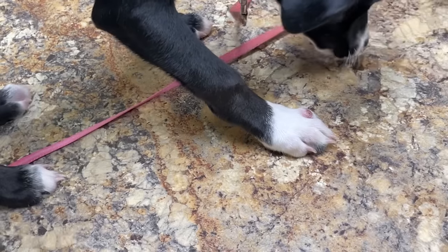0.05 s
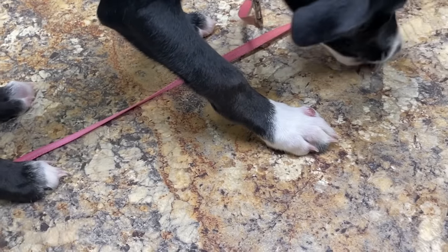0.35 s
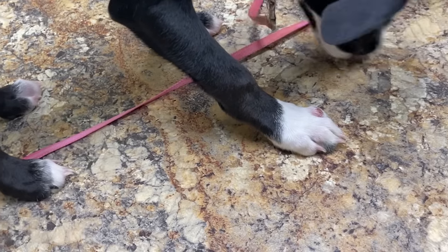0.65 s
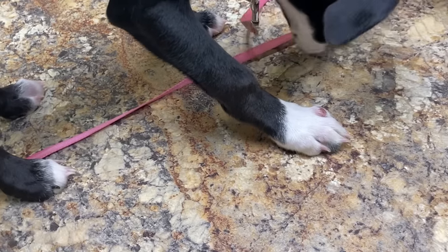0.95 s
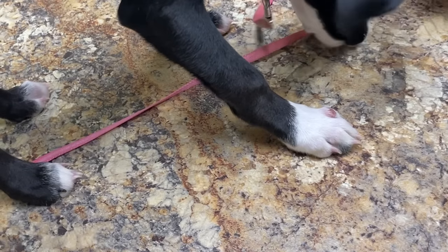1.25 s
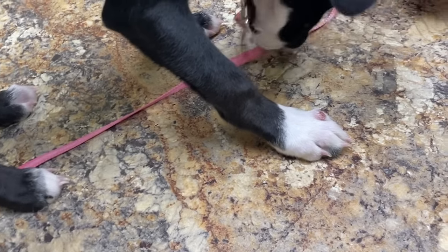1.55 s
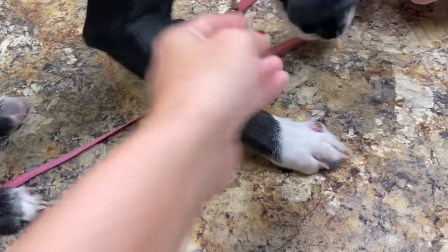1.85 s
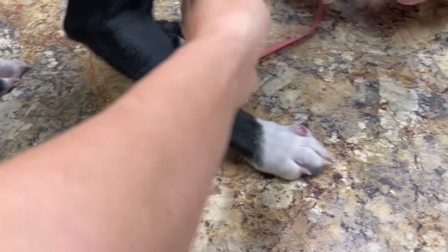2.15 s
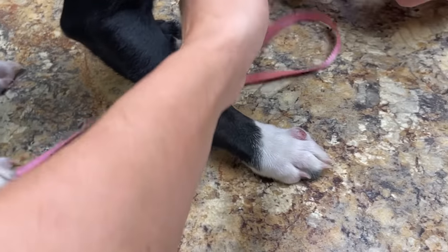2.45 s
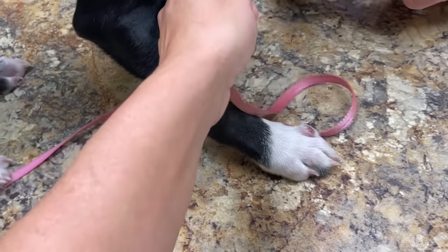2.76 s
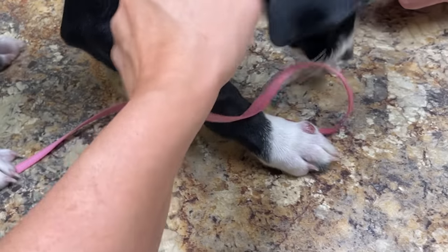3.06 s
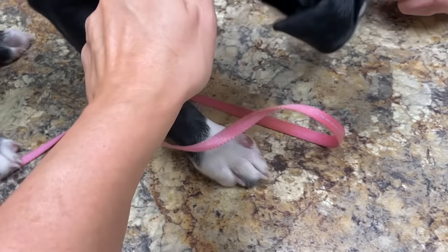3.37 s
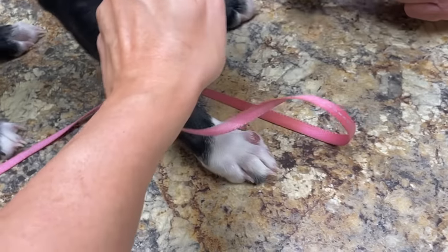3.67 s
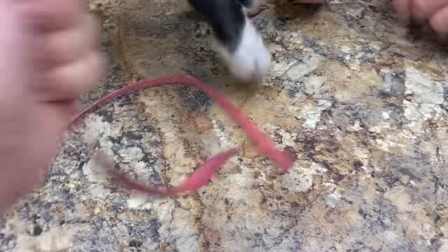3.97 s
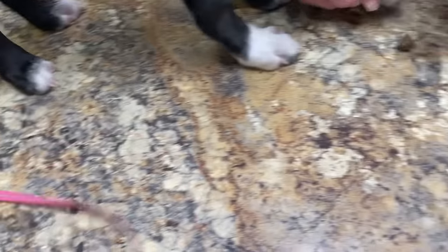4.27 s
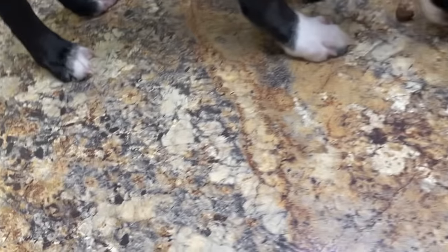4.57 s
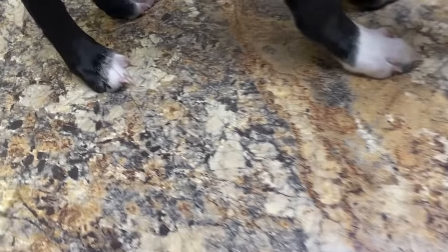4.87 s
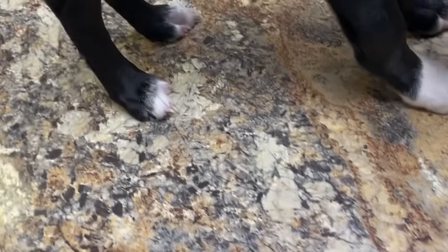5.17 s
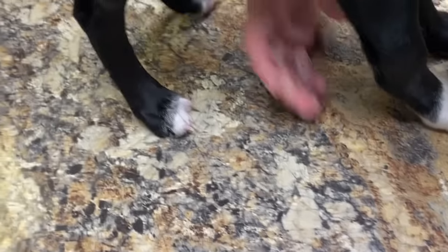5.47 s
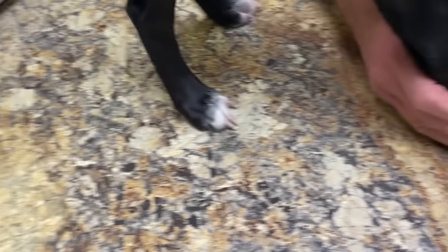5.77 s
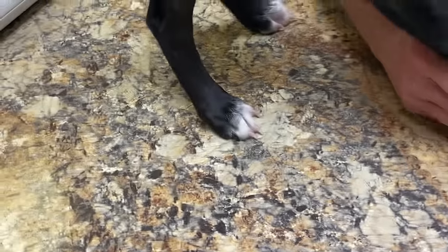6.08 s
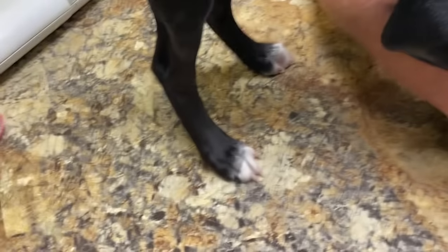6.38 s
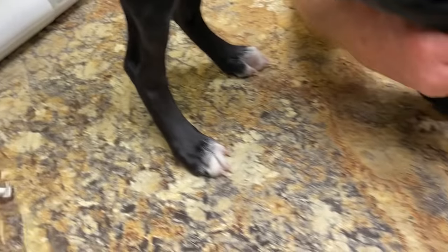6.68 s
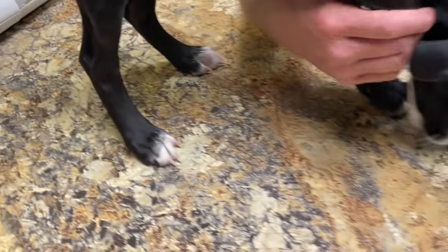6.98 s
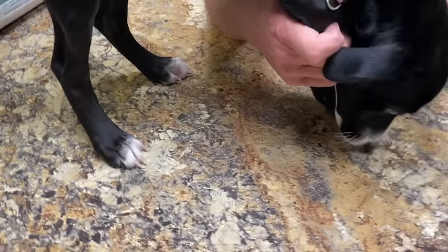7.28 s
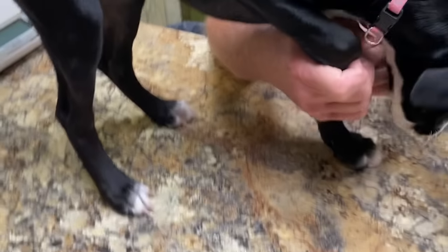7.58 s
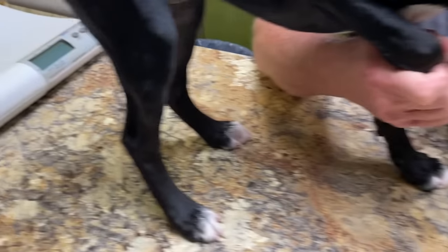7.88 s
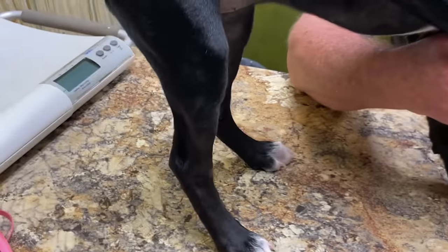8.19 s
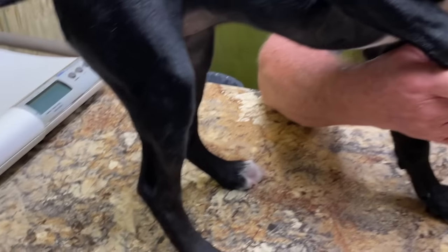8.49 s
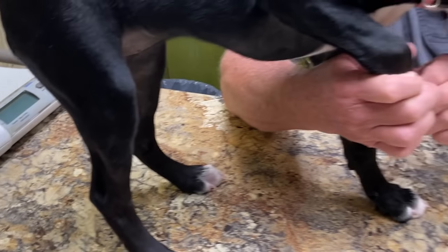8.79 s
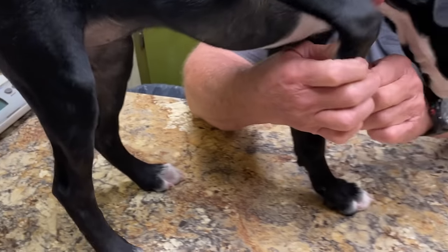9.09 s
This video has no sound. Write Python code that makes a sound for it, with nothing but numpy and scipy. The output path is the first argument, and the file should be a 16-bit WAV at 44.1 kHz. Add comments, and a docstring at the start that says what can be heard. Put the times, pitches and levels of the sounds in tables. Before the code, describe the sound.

A puppy's claws tick and paws shuffle on stone amid faint fur and leash rubbing, a ringing clack and steady ventilation hum.

```python
"""A puppy is held and shifted about on a stone table: fur and leash rub in fine grains, pads drag.
Claws tick, paws pat and firmer contacts knock on the slab. A hard piece, such as the leash clasp,
clacks down and rings; one thin squeak slides down in pitch. Ventilation hums in the small room.
The stereo image is widened, with the channels near antiphase at 10 kHz."""
import sys
import numpy as np
from scipy import signal
from scipy.fft import rfft, irfft, next_fast_len
from scipy.io import wavfile
from scipy.ndimage import uniform_filter1d, map_coordinates

SR = 44100
rng = np.random.default_rng(int(sys.argv[2]) if len(sys.argv) > 2 else 0)


def wav_record(signal):
    """Record a signal, one row per channel, as 16-bit PCM in the file named by sys.argv[1]."""
    frames = np.transpose(np.atleast_2d(signal))
    bounded = np.clip(frames, -1, 1)
    # unit amplitude maps onto the largest positive 16-bit level
    quanta = np.round(bounded * 32767).astype(np.int16)
    wavfile.write(sys.argv[1], SR, quanta)


N = 407484

# Hands over the coat. Each row: start and length in seconds, rub and fur hiss levels in dB.
STROKES = [(0.39, 0.92, -65.5, -87), (1.6, 0.54, -62, -68), (3.38, 0.47, -62, -70), (4.063, 0.66, -62, -69),
           (4.87, 0.44, -63.5, -68.5), (5.4, 0.67, -74, -69.5), (6.137, 0.57, -59, -72.5),
           (7.22, 0.35, -60.5, -73), (8.324, 0.069, -67.5, -75), (8.701, 0.65, -68, -88)]
# The holding hand, never quite still. Each row: time in seconds, fur hiss level in dB.
HOLD_HISS = [(0, -74), (2.8, -74), (6.0, -75), (7.6, -73.5), (8.0, -95.5), (8.6, -81.5), (9.2, -82)]
# Noise colours of rubbing, fur and pads. Each row: frequency in Hz, level in dB.
RUB_SPECTRUM = [(400, -21.5), (900, 5), (1500, -2), (2000, -6.5), (2750, -2.5), (3800, -7), (6000, -5),
                (12000, -47.5)]
FUR_SPECTRUM = [(1500, -26), (3500, -7.5), (5500, -7.5), (8500, 1), (12000, -0.5), (15500, -4.5)]
PAD_SPECTRUM = [(120, -24), (240, 2), (400, 2), (700, -2), (1200, -9), (2500, -38)]
# Pitches of the crinkles within the rubbing.
CRINKLE_HZ = [1500, 2300, 3400, 4800, 6500]
# Brisk strokes. Each row: peak time in seconds, level in dB, rise and fall in seconds,
# centre in Hz, bandwidth over centre.
SWISHES = [(1.44, -50, 0.038, 0.017, 2520, 2.2), (3.299, -51, 0.054, 0.042, 2340, 3.2),
           (4.745, -54.5, 0.022, 0.035, 1390, 3.3), (4.955, -49, 0.033, 0.015, 2280, 2.6),
           (5.463, -43.5, 0.0089, 0.0042, 2750, 0.81), (5.901, -57, 0.054, 0.049, 9000, 3.1),
           (7.543, -58.5, 0.029, 0.037, 5950, 2.3), (8.445, -57, 0.1, 0.038, 1860, 1.33),
           (9.1, -58, 0.039, 0.07, 7930, 2.9)]
# Webbing drawn along; paws sliding. Each row: start and length in seconds, level in dB.
LEASH_PULLS = [(0.394, 1.07, -66.5), (1.695, 0.65, -69), (3.358, 0.35, -58.5), (4.15, 0.37, -64),
               (7.23, 0.26, -67)]
SHUFFLES = [(3.234, 0.35, -53), (4.15, 0.72, -53), (4.907, 0.29, -51), (5.35, 0.83, -57.5),
            (6.17, 0.44, -53)]
# Skin or paw juddering on stone. Each row: start and length in seconds, pitch in Hz, level in dB.
GROANS = [(6.421, 0.019, 447, -33), (8.55, 0.01, 146, -28.5), (8.599, 0.018, 150.8, -31)]
# Claws and collar parts. Each row: start in seconds, level in dB, centre in Hz,
# bandwidth over centre, relative snap level in dB.
TICKS = [(0.1513, -43, 1750, 0.43, -14), (0.172, -44, 1780, 0.74, 0), (0.176, -54, 14800, .3, -12),
         (0.2818, -45, 12900, 0.34, 2), (0.343, -51, 13000, 0.44, 6), (0.3585, -48, 5950, .3, -2),
         (0.4205, -55, 15000, .15, -21), (0.4368, -39.5, 3400, 0.59, -17), (0.505, -49, 15000, .25, -15),
         (0.508, -46, 3980, .6, -9), (0.7217, -41.5, 2820, 0.15, -3), (0.771, -49.5, 4600, .6, -12),
         (0.9447, -38.5, 3070, 0.84, -6), (1.037, -42, 3400, 0.41, -15), (1.207, -46, 7860, 0.17, -15),
         (1.34, -48, 3000, 0.9, -13), (1.4356, -38.5, 3240, .8, -16), (1.6453, -40, 2910, 0.62, -14),
         (1.657, -43, 3580, .9, -10), (1.651, -47, 14000, .4, -8), (1.9627, -38.5, 3000, 0.89, 2),
         (2.045, -46, 4330, .4, -12), (2.271, -48.5, 5590, 0.46, 12.5), (2.283, -48, 6500, .6, 3),
         (2.3252, -28, 4220, 0.91, -12), (2.443, -55, 6000, 0.87, 7), (2.657, -51.5, 2100, 0.42, -8),
         (2.7077, -48, 2300, 0.39, -2), (2.717, -53, 2200, .3, -15), (2.754, -52, 2500, .4, -15),
         (2.785, -46, 7540, .5, -6), (2.7905, -48, 14500, .2, -6), (2.7938, -46, 2800, 1.2, -2),
         (2.814, -51, 5000, .6, -12), (2.879, -41.5, 4800, 0.77, -10), (3.293, -47, 7000, .8, 9),
         (3.465, -51, 2700, .7, 18), (3.551, -44, 6500, .7, 10), (3.562, -37, 5570, .35, 2),
         (3.7693, -39, 3700, 0.18, 12), (3.8095, -34.5, 6000, 1.6, -2), (4.084, -52, 2900, 0.54, 7),
         (4.0975, -36, 1390, 0.67, -5), (4.311, -52.5, 2610, 0.76, 19.5), (4.381, -41.5, 7000, 0.67, -1),
         (4.5005, -44, 5070, 0.55, 8), (4.737, -41, 1500, 0.41, -8), (4.905, -39.5, 5170, 0.34, 2),
         (5.011, -35.5, 2300, 0.85, -6), (5.016, -37, 2000, 1.4, -12), (5.024, -41, 2400, 0.93, -8),
         (5.089, -43, 4500, .7, -6), (5.107, -47, 14000, .4, -10), (5.1423, -39, 1670, 0.58, -7),
         (5.2435, -42.5, 1970, 0.79, -17), (5.268, -46, 3500, 1, -10), (5.4035, -36, 6450, 0.72, -10),
         (6.0962, -27.5, 7700, 0.7, 7.5), (6.1837, -40.5, 3380, 0.71, 3), (6.288, -47, 12900, .5, -2),
         (6.343, -36.5, 4000, 1.2, -20), (6.405, -39, 2620, .6, -6), (6.4135, -32, 4560, 0.53, -13),
         (6.487, -41, 2800, 0.22, -8), (6.585, -43, 2050, 1.2, -6), (6.6835, -23, 4830, 0.12, -9),
         (6.829, -35, 1900, 1.3, -22), (6.8648, -39, 1940, 0.91, -19), (7.101, -42.5, 1990, 0.6, -15),
         (7.1195, -38.5, 2110, 1.1, -5), (7.389, -51, 13800, .3, -12), (7.786, -49.5, 2200, 0.54, 3.5),
         (7.8774, -42, 1790, 0.46, -20.5), (9.0365, -46, 4630, 0.17, -21.5)]
# Paws, arms and leash landing. Each row: start in seconds, level in dB, pitch in Hz,
# scuff T60 in seconds, relative slap level in dB.
PATS = [(0.357, -44, 550, 0.03, -10), (2.325, -38, 730, 0.035, -4), (3.616, -40, 240, 0.15, -30),
        (4.043, -35.5, 285, 0.025, -12), (4.252, -38.5, 444, 0.045, -19), (5.01, -43.5, 510, 0.14, -23),
        (5.035, -41, 590, 0.046, -14), (5.529, -32, 96, 0.11, -36), (6.343, -39.5, 976, 0.022, -3.5),
        (6.585, -40, 606, .03, -12.5), (8.701, -36.5, 83.6, 0.12, -39), (8.746, -40, 166, 0.03, -32),
        (8.872, -33, 124.8, 0.037, -30)]
# Firm contacts. Each row: start in seconds, level in dB, body pitch in Hz, its T60 in seconds,
# upper pitch in Hz, its T60 in seconds, its relative level in dB.
KNOCKS = [(0.945, -35.5, 750, 0.021, 993, 0.063, -9.5), (1.963, -32, 810, 0.03, 1870, 0.04, -2.5),
          (1.9892, -36.5, 1040, 0.021, 1950, 0.015, -2), (4.0969, -24, 422, 0.022, 778, 0.019, -1),
          (4.1097, -33, 515, 0.025, 1500, 0.024, -11), (4.6488, -35, 360, 0.04, 720, 0.034, -5),
          (5.0878, -35.5, 623, 0.035, 1160, 0.033, -5), (5.532, -30, 327, 0.014, 740, 0.026, -9),
          (6.4878, -28, 660, 0.018, 1240, 0.056, -25)]
# The clasp's landing and bounce. Each row: start in seconds, level in dB.
CLACKS = [(6.6914, -2), (6.7144, -20.5)]
# Modes of clasp and table. Each row: frequency in Hz, relative level in dB, T60 in seconds.
CLASP_MODES = [(271, -3.5, 0.43), (329, 0, 0.2), (365, 1.5, 0.14), (396, 2.5, 0.19), (496, 0, 0.23),
               (571, 0, 0.28), (1050, -0.5, 0.15), (1307, 0, 0.19), (1413, -0.5, 0.2), (1590, 5, 0.12),
               (2014, 3.5, 0.19), (2490, 8, 0.087), (2664, 3, 0.15), (2720, -1, .13), (3000, 1, .15),
               (3000, 4.5, 0.15), (3580, 7.5, 0.11), (4250, 7, .11), (4802, 4.5, .13), (5470, 2, 0.12),
               (7250, -0.5, 0.073)]
# Colours of the clasp's blow and the squeak's echo. Each row: frequency in Hz, level in dB.
CLASP_SPECTRUM = [(200, -39), (290, -5), (400, -2.5), (600, -1.5), (1000, 0), (1250, -6.5), (1550, -1.5),
                  (2000, -4), (2900, 2.5), (3800, -3.5), (5500, 1.5), (7500, -4), (9000, -5), (11000, -15),
                  (15000, -21)]
SQUEAK_ECHO_SPECTRUM = [(4000, -5.5), (4450, -6), (4950, -7.5), (5550, 7), (6200, 1), (12000, -1)]
# A faint higher branch, then the main squeak. Each row: peak time in seconds, pitch in Hz, level in dB, pitch
# swing as a fraction.
SQUEAKS = [(9.07, 7100, -58.5, 0.039), (9.087, 5180, -31, 0.19)]
# Air in the ducts. Each row: frequency in Hz, level in dB.
DUCT_SPECTRUM = [(22, -31), (35, -9), (52, -3.5), (80, -7), (140, -1), (220, -12), (310, -16), (430, -12.5),
                 (570, -16.5), (650, -20), (970, -21.5), (1130, -30.5), (1400, -31), (1650, -36),
                 (3000, -39), (6000, -52.5), (15000, -53)]
# Low room resonances. Each row: frequency in Hz, nominal width in Hz, level in dB.
HUM_MODES = [(60.8, 4.9, -53), (95.1, 17, -52.5), (135, 9.9, -48), (149.16, 2.9, -56), (171.3, 30, -63),
             (194.3, 18.3, -59), (391.5, 4.8, -71), (573, 34, -72.5), (955, 45, -75)]
# Room decay. Each row: frequency in Hz, T60 in seconds.
ROOM_T60 = [(150, 0.06), (500, 0.41), (2500, 0.21), (6000, 0.18), (15000, 0.14)]
# Stereo widening, near antiphase at 10 kHz. Each row: frequency in Hz, left-right correlation.
CORRELATION = [(120, 1), (300, 0.94), (500, 0.19), (800, -0.46), (1200, -0.021), (1900, 0.67),
               (3300, -0.069), (4200, 0.32), (4850, -0.41), (6000, 0.45), (7600, 0.024), (9200, -1),
               (11000, -1), (14500, 0.9)]
# Channel balance. Each row: frequency in Hz, left minus right in dB.
BALANCE = [(150, 0), (350, 3), (600, .3), (1100, -3), (2500, -.8), (5000, -.8), (8000, .8)]

EVENT_TIME_S = np.arange(SR // 2) / SR
CENTRED_TIME_S = np.arange(-(SR // 4), SR // 4) / SR


def handling(hold_rub_db=-73.5, crinkle_db=-6):
    """Hairs catch and slip under the hands: grainy rubbing and fur hiss."""
    hiss_db = np.interp(np.arange(N) / SR, *np.transpose(HOLD_HISS))
    rub_power, fur_power = amp(hold_rub_db) ** 2, amp(hiss_db) ** 2
    for start_s, length_s, rub_db, fur_db in STROKES:
        speed = gesture(start_s, length_s, attack_s=0.046, release_s=0.2)
        rub_power += (amp(rub_db) * speed) ** 2
        fur_power += (amp(fur_db) * speed) ** 2
    rub_gain = np.sqrt(rub_power) * amp(-1.5 + 1.7 * wobble(35))
    rub = 0.95 * rush(RUB_SPECTRUM, amp(1.4 * wobble(700))) + amp(crinkle_db) * crinkles()
    fur_grains = amp(1.9 * wobble(1200) + 1.5 * wobble(150))
    fur = 1.03 * rush(FUR_SPECTRUM, fur_grains) + 0.39 * crackle()
    fur_gain = np.sqrt(fur_power) * amp(1 + 1.1 * wobble(30))
    return patchy(rub_gain * rub + fur_gain * fur, depth_db=2.5)


def crinkles(per_band_per_s=6.2):
    """Webbing and coat give way in irregular, loosely pitched steps."""
    shape = (len(CRINKLE_HZ), N)
    steps = (rng.random(shape) < per_band_per_s / SR) * amp(2 * rng.standard_normal(shape))
    slips = signal.fftconvolve(steps, fade(0.017)[None], axes=1)[:, :N] * rng.standard_normal(shape)
    bands = [bandpass(slip, hz, 0.4 * hz) / np.sqrt(hz) for slip, hz in zip(slips, CRINKLE_HZ)]
    return unit(in_room(sum(bands), wet_db=-5))


def crackle(catches_per_s=45):
    """Hairs catch crisply, each scraping for a few ms."""
    catches = (rng.random(N) < catches_per_s / SR) * amp(3.6 * rng.standard_normal(N))
    scrapes = signal.fftconvolve(catches, fade(0.007))[:N] * rng.standard_normal(N)
    return unit(in_room(bandpass(scrapes, 7600, 8000, stages=1), wet_db=-2.5))


def swishes():
    """Brisk strokes over the coat: grainy noise bands swell and stop."""
    out, t = np.zeros((2, N)), CENTRED_TIME_S
    for peak_s, db, rise_s, fall_s, hz, breadth in SWISHES:
        grains = rng.standard_normal(len(t)) * amp(2.7 * wobble(500)[:len(t)])
        band = unit(bandpass(grains, hz, breadth * hz))
        add(out, peak_s + t[0], in_room(amp(db) * swell(rise_s, fall_s) * band, wet_db=-5))
    return out


def leash():
    """Webbing ribs pass an edge at a near-steady rate: a faint, narrow zip."""
    pull = sum(amp(db) * gesture(start_s, length_s, attack_s=0.058, release_s=0.09)
               for start_s, length_s, db in LEASH_PULLS)
    flutter = amp(-4 + 3.1 * wobble(30))
    ribs = lambda f: resonance(f, 2720, 450) ** 2 + 0.5 * resonance(f, 3300, 400) ** 2
    return pull * flutter * unit(filtered(rng.standard_normal((2, N)), ribs))


def shuffling():
    """Soft pads drag over the stone."""
    drag = sum(amp(db) * gesture(start_s, length_s, attack_s=0.034, release_s=0.1)
               for start_s, length_s, db in SHUFFLES)
    return drag * amp(-1.5 + 2.6 * wobble(22)) * rush(PAD_SPECTRUM)


def groans(ramp_cycles=2):
    """Skin or a paw sticks and slips on polished stone at a near-steady rate."""
    out = np.zeros(N)
    for start_s, length_s, hz, db in GROANS:
        phase = 2 * np.pi * np.cumsum(hz * (1 + 0.08 * wobble(200))) / SR
        envelope = gesture(start_s, length_s, ramp_cycles / hz, ramp_cycles / hz)
        out += amp(db) * envelope * np.sin(phase + 0.24 * wobble(400))
    return in_room(out, wet_db=-8)


def ticks(rattle_t60_s=0.016, snap_t60_s=0.0083):
    """Claws and collar parts strike: a short rattle and a bright, drier snap."""
    out, impulse = np.zeros((2, N)), EVENT_TIME_S == 0
    for start_s, db, hz, breadth, snap_db in list(TICKS) + fidgets():
        rattle = peaked(bandpass(contact(rattle_t60_s), hz, breadth * hz))
        strike = 0.5 * impulse + 0.7 * contact(snap_t60_s)
        snap = peaked(bandpass(strike, 10000, 13000, stages=1))
        near = in_room(amp(snap_db + 0.5) * snap, wet_db=-7)
        add(out, start_s, amp(db - 1.5) * (in_room(rattle, wet_db=-4) + near))
    return out


def fidgets(end_s=6, per_s=4, breadth=0.27, snap_db=-8.5):
    """The puppy fidgets: faint ticks at loose intervals, as rows like TICKS."""
    draws = rng.standard_normal((int(end_s * per_s), 3))
    return [(abs(k + 0.5 + 0.5 * late) / per_s, -60.5 + 3 * loud, 3160 * 2 ** (0.56 * high),
             breadth, snap_db) for k, (late, loud, high) in enumerate(draws)]


def pats(slap_ratio=1.9, slap_t60_s=0.027):
    """Soft blows slap the slab and push it for a few cycles; it hardly rings."""
    out, t = np.zeros((2, N)), EVENT_TIME_S
    for start_s, db, hz, t60_s, slap_db in PATS:
        scuff = peaked(bandpass(contact(t60_s), hz, 0.72 * hz))
        push = np.sin(2 * np.pi * hz * t) * fade(1.2 * t60_s)
        onset = 1 - np.exp(-(t * hz) ** 2)  # flesh yields for about one cycle
        thud = peaked(onset * (scuff + 0.8 * push))
        slap_hz = slap_ratio * hz
        slap = peaked(bandpass(contact(slap_t60_s), slap_hz, 1.7 * slap_hz, stages=3))
        add(out, start_s, in_room(amp(db + 1) * (thud + amp(slap_db) * slap), wet_db=-3.5))
    return out


def knocks(force_rise_s=0.00041, crunch_db=-10.5, crunch_t60_s=0.034):
    """Firm contacts crunch briefly and ring two short notes of the table."""
    out, t = np.zeros((2, N)), EVENT_TIME_S
    for start_s, db, body_hz, body_t60_s, upper_hz, upper_t60_s, upper_db in KNOCKS:
        body = np.sin(2 * np.pi * body_hz * t) * fade(body_t60_s)
        upper = amp(upper_db) * np.sin(2 * np.pi * upper_hz * t) * fade(upper_t60_s)
        notes = peaked((1 - np.exp(-t / force_rise_s)) * (body + upper))
        crunch = peaked(bandpass(contact(crunch_t60_s), upper_hz, 1.1 * upper_hz))
        add(out, start_s, in_room(amp(db) * (notes + amp(crunch_db) * crunch), wet_db=-7))
    return out


def clasp():
    """A hard piece hits stone: crack, brief chatter, hollow ring."""
    out, t = np.zeros((2, N)), EVENT_TIME_S
    blow = peaked(minimum_phase(CLASP_SPECTRUM))
    crack = np.pad(blow, (0, len(t) - len(blow)))
    for start_s, db in CLACKS:
        chatter = signal.fftconvolve(0.18 * contact(0.023), blow)[:len(t)]
        ring = np.zeros(len(t))
        for hz, mode_db, t60_s in CLASP_MODES:
            gain = amp(mode_db + rng.normal(0, 1))
            ring += gain * np.sin(2 * np.pi * (hz * t + rng.random())) * fade(t60_s)
        clack = in_room(crack, wet_db=0.5) + chatter + in_room(amp(-33) * ring, wet_db=-16.5)
        add(out, start_s, amp(db) * clack)
    return out


def squeak(glide_s=0.014):
    """A thin tone with two weak overtones slides down; its upper part lingers in the room."""
    out, t = np.zeros((2, N)), CENTRED_TIME_S
    for peak_s, pitch_hz, db, swing in SQUEAKS:
        hz = pitch_hz * (1 - swing * np.tanh(t / glide_s))
        phase = 2 * np.pi * np.cumsum(hz * (1 + 0.013 * wobble(900)[:len(t)])) / SR
        tone = np.sin(phase) + amp(-15) * np.sin(2 * phase) + amp(-22) * np.sin(3 * phase)
        grip = amp(2.5 * wobble(450)[:len(t)])
        direct = amp(db) * tone * grip * swell(rise_s=0.006, fall_s=0.0094)
        tail = in_room(direct, wet_db=2, stretch=1.1) - direct
        echo = filtered(tail, lambda f: amp(along(SQUEAK_ECHO_SPECTRUM, f)))
        add(out, peak_s + t[0], direct + echo)
    return out


def ventilation(duct_db=-46.5):
    """Air rushes in the ducts and keeps low room resonances humming."""
    def modes(f):
        return np.sqrt(sum(amp(db) ** 2 / width_hz * np.abs(resonance(f, hz, 1.085 * width_hz)) ** 4
                           for hz, width_hz, db in HUM_MODES))
    hum = filtered(rng.standard_normal((2, N)), modes) * np.sqrt(SR / 2)
    return hum + amp(duct_db) * rush(DUCT_SPECTRUM)


def in_room(x, wet_db, stretch=1, onset_s=0.0019):
    """Direct sound plus a fresh pair of diffuse tails; stretch lengthens them."""
    hz, t, noise = signal.stft(rng.standard_normal((2, SR // 2)), SR, nperseg=256)
    decay = amp(-60 * t / stretch / along(ROOM_T60, hz)[:, None])
    tail = signal.istft(noise * decay, SR, nperseg=256)[1]
    tail *= np.minimum(np.arange(tail.shape[1]) / SR / onset_s, 1)
    tail /= np.linalg.norm(tail[0])
    return x + amp(wet_db) * signal.fftconvolve(x[None], tail, axes=1)[:, :len(x)]


def widen_stereo(pair):
    """One signal feeds the channels' sum, one their difference, shared out by frequency."""
    def shares(f):
        angle = np.arccos(np.clip(along(CORRELATION, f), -0.993, 0.993)) / 2
        return np.array([np.cos(angle), 1j * np.sin(angle)])
    mid, side = filtered(pair, shares)
    left_right = np.array([mid + side, mid - side])
    return filtered(left_right, lambda f: amp(np.outer([0.5, -0.5], along(BALANCE, f))))


def amp(db):
    """Decibels to gain."""
    return 10 ** (np.asarray(db) / 20)


def unit(x):
    """x at rms 1."""
    return x / np.sqrt(np.mean(x ** 2) + 1e-20)


def peaked(x):
    """x at peak 1."""
    return x / np.abs(x).max()


def along(points, hz):
    """(Hz, value) points read on a log axis."""
    knots_hz, values = np.transpose(points)
    return np.interp(np.log(hz + 1), np.log(knots_hz + 1), values)


def wobble(knots_per_s):
    """Smooth random curve."""
    knots = rng.standard_normal(int(N * knots_per_s / SR) + 4)
    return map_coordinates(knots, [np.arange(N) * knots_per_s / SR])


def gesture(start_s, length_s, attack_s, release_s):
    """A movement speeds up around its start, holds and dies away."""
    t = np.arange(N) / SR - start_s
    return (0.5 + 0.5 * np.tanh(2 * t / attack_s)) * np.exp(-np.maximum(t - length_s, 0) / release_s)


def swell(rise_s, fall_s):
    """Exponential rise and fall about a peak."""
    return np.exp(-np.abs(CENTRED_TIME_S) / np.where(CENTRED_TIME_S < 0, rise_s, fall_s))


def fade(t60_s):
    """Half a second of exponential decay."""
    return 1000.0 ** (-EVENT_TIME_S / t60_s)


def contact(t60_s):
    """A dying burst of tiny collisions."""
    return rng.standard_normal(SR // 2) * fade(t60_s)


def filtered(x, response):
    """x through a complex frequency response."""
    n = x.shape[-1]
    size = next_fast_len(n + SR // 4)
    return irfft(rfft(x, size) * response(np.fft.rfftfreq(size, 1 / SR)), size)[..., :n]


def resonance(f, hz, width_hz):
    """Causal response of one resonance."""
    return 1j * f * width_hz / (hz * hz - f * f + 1j * f * width_hz)


def bandpass(x, hz, width_hz, stages=2):
    """x through equal resonances in series."""
    return filtered(x, lambda f: resonance(f, hz, width_hz) ** stages)


def minimum_phase(spectrum, size=2048):
    """Causal impulse response of the given colour."""
    cepstrum = irfft(np.log(amp(along(spectrum, np.fft.rfftfreq(size, 1 / SR)))))
    fold = np.r_[1, np.full(size // 2 - 1, 2), 1, np.zeros(size // 2 - 1)]
    return irfft(np.exp(rfft(cepstrum * fold)))


def rush(spectrum, drive=1):
    """Two unrelated coloured noises, excited by drive; rms 1."""
    return unit(filtered(drive * rng.standard_normal((2, N)), lambda f: amp(along(spectrum, f))))


def patchy(x, depth_db):
    """A slow random gain for each region of time and frequency."""
    spectra = signal.stft(x, nperseg=256)[2]
    field = rng.standard_normal(spectra.shape[1:])
    for axis in (0, 1, 0, 1):
        field = uniform_filter1d(field, size=16, axis=axis)
    return signal.istft(spectra * amp(depth_db * unit(field)), nperseg=256)[1][:, :N]


def add(track, start_s, sound):
    """Mix a sound into the track."""
    part = track[:, round(start_s * SR):][:, :sound.shape[1]]
    part += sound[:, :part.shape[1]]


def scene():
    """Everything on and around the table, in widened stereo."""
    rubbing = handling() + swishes() + leash() + shuffling() + groans()
    return widen_stereo(ventilation() + rubbing + ticks() + pats() + knocks() + clasp() + squeak())


def record(dry, cutoff_hz=16100):
    """The recorder's steep band limit."""
    return filtered(dry, lambda f: 1 / np.sqrt(1 + (f / cutoff_hz) ** 160))


dry = scene()
out = record(dry)
wav_record(out)
```